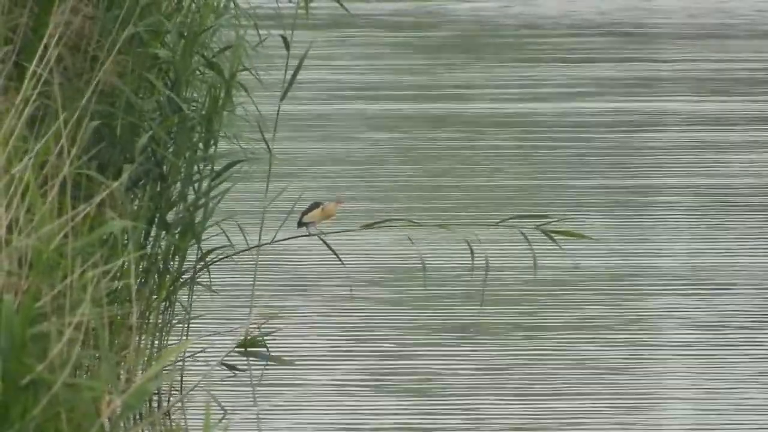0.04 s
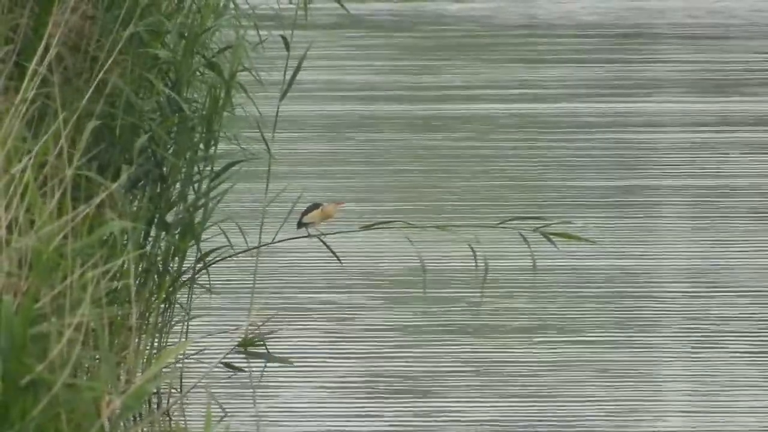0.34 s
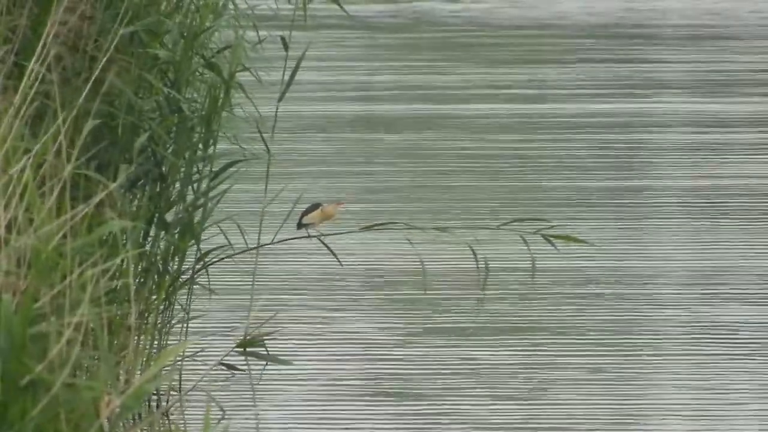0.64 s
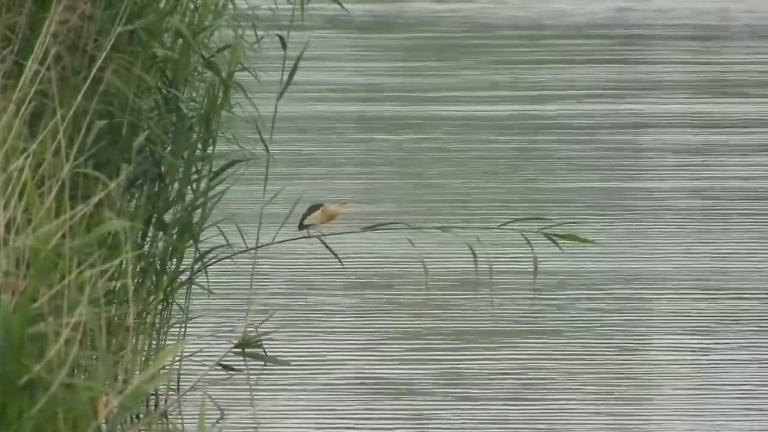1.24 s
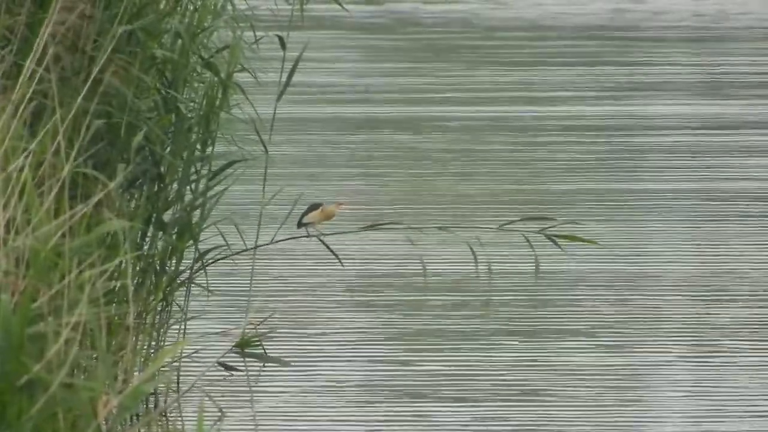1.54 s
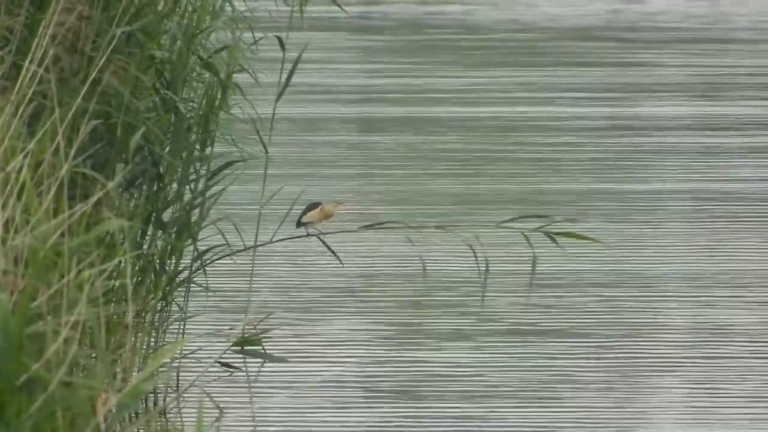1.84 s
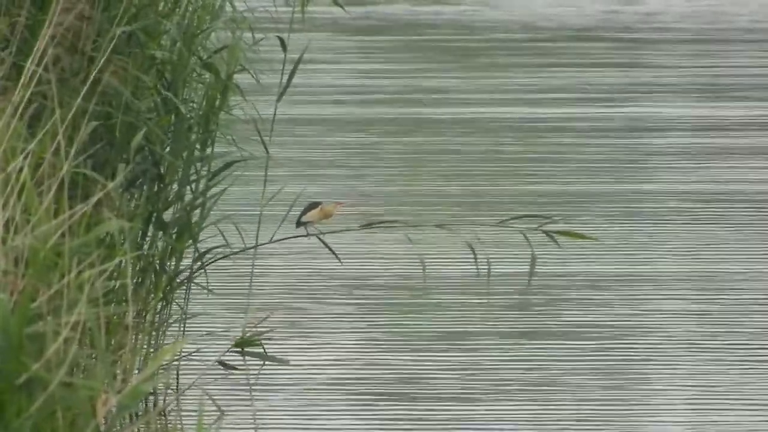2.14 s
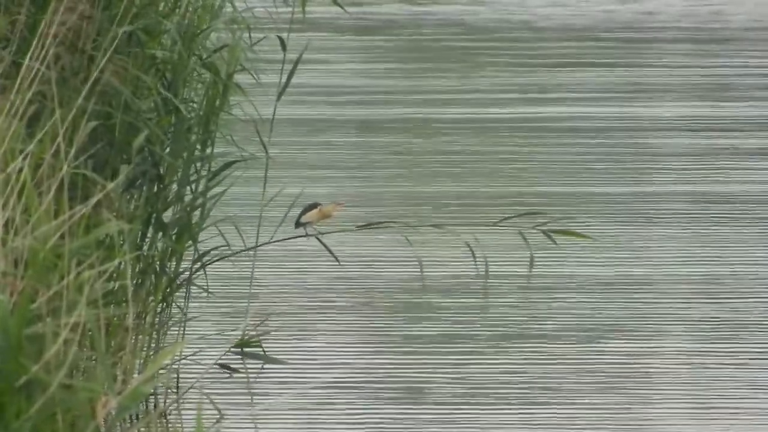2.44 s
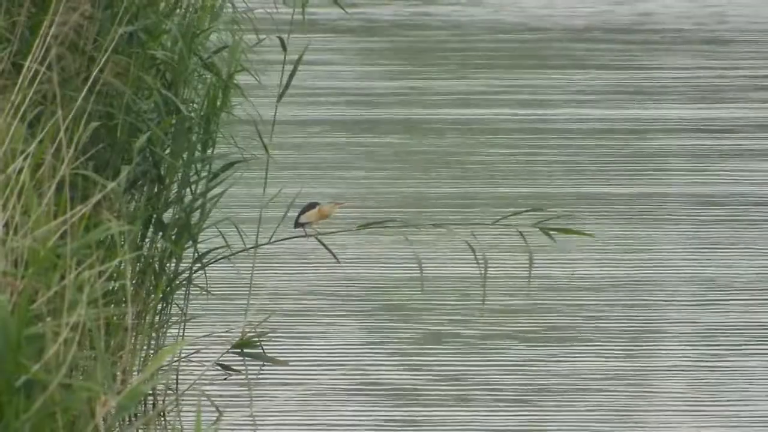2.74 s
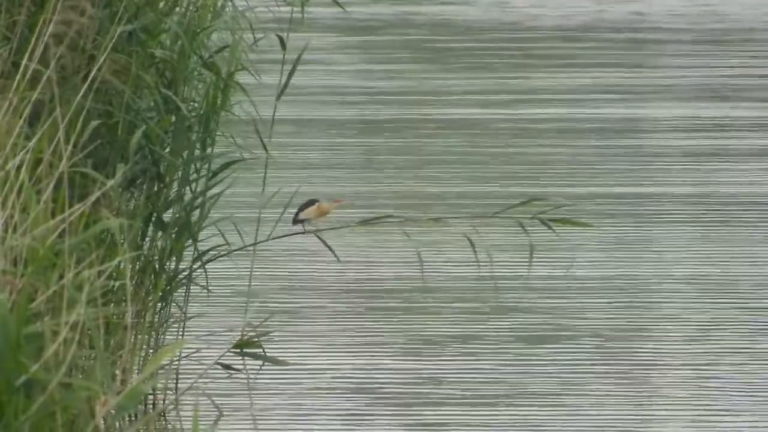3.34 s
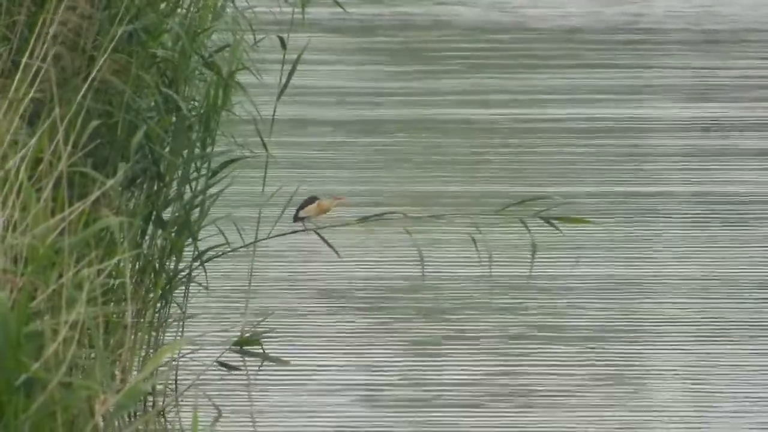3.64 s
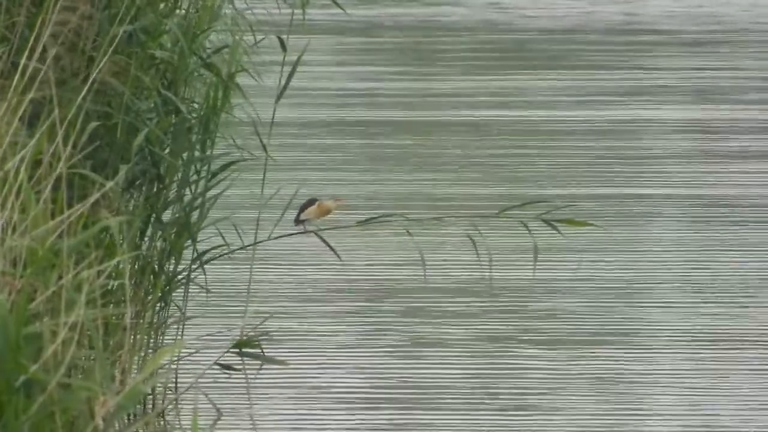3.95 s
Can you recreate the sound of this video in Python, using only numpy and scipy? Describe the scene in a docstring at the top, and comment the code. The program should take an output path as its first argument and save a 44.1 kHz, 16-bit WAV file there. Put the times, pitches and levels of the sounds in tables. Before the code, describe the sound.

Wind buffets the microphone in uneven low rumbles over faintly hissing reeds.

```python
"""Wind buffets two microphone ports at a pond's edge, each in its own rhythm: rumble in light air,
flutter in strong, puffs from eddies, one brief throb from shed vortices. Behind it: open air, hissing
reeds, two stalk ticks, far birds, faint random gliding tones, a thin whine.
Near the end a gust slaps the right port and the limiter ducks everything."""
import sys
import numpy as np
from scipy import signal
from scipy.fft import rfft, irfft
from scipy.io import wavfile
from scipy.ndimage import uniform_filter1d

SR = 44100
rng = np.random.default_rng(int(sys.argv[2]) if len(sys.argv) > 2 else 0)


def file_out(sig):
    """Save sig as 16-bit WAV at sys.argv[1]."""
    # one column per channel
    cols = np.atleast_2d(sig).T
    # limit, then scale
    lim = np.clip(cols, -1, 1)
    pcm = np.round(lim * 32767).astype(np.int16)
    wavfile.write(sys.argv[1], SR, pcm)


N = 176400
T = np.arange(N) / SR

# Ambience at the two ports: (frequency [Hz], left-right correlation [-])
PORT_CORRELATION = [(100, 0.12), (700, 0.81), (1300, 0.55), (2400, 0.16), (4400, 0.17), (6200, 0),
                    (8500, -0.4), (11000, -0.13), (15000, 0)]
# Open air and reed hiss: (frequency [Hz], relative density [dB])
AIR_SPECTRUM = [(40, 3), (200, -3.5), (400, -2), (700, -7.5), (1000, -12), (1500, -15.5), (2200, -15.5),
                (3300, -15.5), (4500, -42), (8000, -45)]
REED_SPECTRUM = [(1500, -26), (3200, -13), (3700, -2.5), (4200, 1), (4900, 0.5), (6500, -1), (8000, 1.5),
                 (9000, 1.5), (10000, -6), (11500, -11.5), (15000, -15.5)]
# Open air and reed hiss: (time [s], level [dB])
AIR_ENVELOPE = [(0, -51), (.8, -53.5), (1.35, -53), (1.72, -51.5), (1.95, -53.5), (3.2, -54.3), (4, -52)]
REED_ENVELOPE = [(0, -51), (1.2, -52.5), (2.7, -52.4), (3.45, -51), (4, -51.5)]
# Steady tones: (frequency [Hz], level [dB])
WHINE_TONES = [(7483, -77), (12947, -82)]
# Dry stalks: (time [s], level [dB], low edge [Hz], high edge [Hz])
STALK_TICKS = [(0.182, -43, 7360, 9100), (3.7343, -35, 3900, 7260)]
# Rising bird calls: (start [s], relative level [dB], rms rasp [Hz])
BIRD_CHIRPS = [(.273, -49.5, 230), (1.941, -50, 190), (3.395, -54, 750)]
# Contour of each chirp: (age [s], pitch [Hz], gain [dB])
CHIRP_CONTOUR = [(0, 4200, -12), (.006, 5400, -6), (.011, 6050, 0), (.024, 6000, -1), (.027, 6680, -1),
                 (.04, 6590, 1), (.056, 6550, -12)]
# Plain bird notes: (start [s], length [s], pitch [Hz], glide [Hz], relative level [dB])
BIRD_PEEPS = [(.395, 0.034, 5570, -330, -54), (0.812, .05, 7580, 0, -58.5), (1.16, .06, 7600, 0, -57.5),
              (1.27, 0.31, 1568, 0, -66), (1.53, 0.024, 6100, -1000, -52), (3.069, 0.029, 3990, 0, -53.5)]
# Vortex shedding, right port: (time [s], pitch [Hz], level [dB])
THROB_CONTOUR = [(3.58, 80, -30), (3.605, 85, -5), (3.622, 100, -6.5), (3.65, 70, -6), (3.675, 72, -6),
                 (3.69, 115, -7), (3.705, 120, -30)]
# Eddies: (time [s], decay [s], relative left level [dB], relative right level [dB])
EDDY_PUFFS = [(.735, 0.024, -47, -70), (1.181, 0.06, -40, -49), (1.3, .05, -41, -48),
              (1.41, 0.034, -39, -35), (1.531, 0.021, -69, -40.5), (1.824, .02, -40, -70),
              (2.05, 0.09, -37.5, -66), (2.24, .04, -38, -70), (2.36, .06, -39, -70),
              (2.737, 0.012, -27, -69), (2.923, 0.035, -35, -65), (3.009, 0.091, -38, -68),
              (3.146, 0.014, -34, -52), (3.176, 0.0076, -25, -39), (3.255, 0.018, -39, -62),
              (3.387, 0.022, -26, -50), (3.587, 0.008, -30, -42), (3.671, 0.02, -72, -38),
              (3.788, 0.019, -37, -27), (3.924, 0.017, -26.5, -47), (3.962, 0.022, -23.5, -48)]
# Eddies, light wind, strong wind: (frequency [Hz], relative density [dB])
PUFF_SPECTRUM = [(120, -27), (230, -1), (320, 4), (420, -2.5), (540, -13), (720, -26.5), (1500, -46),
                 (4000, -75)]
RUMBLE_SPECTRUM = [(20, -6.5), (43, -8.5), (65, -0.5), (95, 0), (130, -5), (190, -14), (250, -32),
                   (400, -48.5), (900, -75)]
FLUTTER_SPECTRUM = [(20, -4), (60, -10.5), (110, -2), (185, 0.5), (215, -4), (250, -20), (340, -27),
                    (430, -37), (650, -52), (1400, -77)]
# Wind pressure per port: (time [s], relative level [dB])
LEFT_PRESSURE = [(0.0, -18), (0.11, -34), (0.15, -16), (0.28, -19), (0.4, -26), (0.53, -15), (0.6, -30),
                 (0.66, -23), (0.75, -17), (0.85, -21), (1.1, -14.5), (1.22, -19), (1.42, -13.5),
                 (1.52, -27), (1.6, -33), (1.76, -35), (1.835, -14), (1.9, -38), (1.96, -15), (2.01, -11),
                 (2.08, -13), (2.12, -19.5), (2.25, -13.5), (2.35, -18), (2.44, -16), (2.6, -29),
                 (2.66, -9), (2.71, -18), (2.78, -13), (2.83, -19.5), (3.01, -9), (3.36, -19.5),
                 (3.42, -12), (3.46, -25), (3.51, -17), (3.59, -20), (3.62, -30), (3.74, -35), (3.8, -11),
                 (3.88, -19), (3.99, -7)]
RIGHT_PRESSURE = [(0, -18), (.05, -17), (.1, -37), (.23, -21), (.36, -22), (.39, -14.5), (.46, -33),
                  (.93, -31), (1.04, -17), (1.13, -19), (1.34, -15.5), (1.4, -18), (1.55, -14.5),
                  (1.62, -27), (1.7, -33), (2.02, -31.5), (2.09, -25), (2.2, -31), (2.47, -32), (2.55, -21),
                  (2.69, -27), (2.72, -19), (2.82, -21), (3.06, -25), (3.18, -14), (3.28, -30),
                  (3.42, -14.5), (3.5, -22.5), (3.6, -15), (3.72, -17), (3.78, -13), (3.82, -6),
                  (3.99, -17)]

BIN_HZ = np.fft.rfftfreq(N, 1 / SR)
RIGHT_ONLY, OPPOSED = np.array([[0], [1]]), np.array([[1], [-1]])


def from_db(db):
    """Decibels to gain."""
    return 10 ** (np.asarray(db) / 20)


def unit_rms(x):
    """Scale to rms 1."""
    return x / np.sqrt(np.mean(x ** 2) + 1e-20)


def over_time(rows):
    """Table interpolated at every sample."""
    return np.interp(T, *np.transpose(rows))


def over_hz(rows):
    """Table interpolated at every FFT bin, log axis."""
    hz, value = np.transpose(rows)
    return np.interp(np.log(BIN_HZ + 1e-3), np.log(hz), value)


def sine(hz, phase_rad=0):
    """Sine following a pitch curve."""
    return np.sin(2 * np.pi * np.cumsum(hz) / SR + phase_rad)


def bell(centre_s, width_s, time_s=T):
    """Gaussian pulse, peak 1."""
    return np.exp(-.5 * ((time_s - centre_s) / width_s) ** 2)


def drift(rate_hz):
    """Low-passed random wander, rms 1."""
    return unit_rms(irfft(rfft(rng.standard_normal(N)) / (1 + (BIN_HZ / rate_hz) ** 2), N))


def diffuse_noise(spectrum):
    """Noise reaching both ports from all around, rms 1."""
    mid, side = rfft(rng.standard_normal((2, N))) * from_db(over_hz(spectrum))
    correlation = over_hz(PORT_CORRELATION)
    return unit_rms(irfft(np.sqrt(1 + correlation) * mid + np.sqrt(1 - correlation) * side * OPPOSED, N))


def turbulence(spectrum, window_s=.047):
    """Coloured noise, rms 1, slow swings evened out so the gusts set the level."""
    noise = unit_rms(irfft(rfft(rng.standard_normal(N)) * from_db(over_hz(spectrum)), N))
    size = int(window_s * SR)
    power = uniform_filter1d(uniform_filter1d(noise ** 2, size), size)
    return unit_rms(noise / np.sqrt(power + 1e-9))


def whine():
    """Thin, steady high tones."""
    return sum(from_db(db) * np.sin(2 * np.pi * hz * T) for hz, db in WHINE_TONES)


def open_air():
    """Soft, dark wash from all around."""
    return from_db(over_time(AIR_ENVELOPE)) * diffuse_noise(AIR_SPECTRUM)


def blips(per_s=115, low_hz=580, high_hz=3438, tilt_db_per_octave=-2.8, glide_octaves_per_s=1.5):
    """Faint, short, random gliding tones that swell with the air noise."""
    size = SR // 5
    out = np.zeros((2, N + size))
    local_s = T[:size] - T[size // 2]
    for when, height, length, strength, side, glide, path in rng.random((int(per_s * N / SR), 7)):
        octaves = height * np.log2(high_hz / low_hz)
        hz = low_hz * 2 ** (octaves + glide_octaves_per_s * (2 * glide - 1) * local_s)
        db = -58.5 + tilt_db_per_octave * octaves + 2 * (2 * strength - 1)
        pan_db = 6 * (side - .5) * OPPOSED
        envelope = from_db(db + pan_db) * bell(0, .0125 * (.5 + length), local_s)
        start = int(when * N)
        out[:, start:start + size] += envelope * sine(hz, phase_rad=(2 * path - 1) * OPPOSED)
    air_db = over_time(AIR_ENVELOPE)
    return from_db(air_db - air_db.mean()) * out[:, size // 2:size // 2 + N]


def reeds(flicker_db=1):
    """Countless leaves brush together in a flickering hiss."""
    db = over_time(REED_ENVELOPE) + flicker_db * drift(rate_hz=10)
    return from_db(db) * diffuse_noise(REED_SPECTRUM)


def stalk_ticks():
    """Dry stalks tick: tiny bursts of band noise."""
    out = np.zeros((2, N))
    for time_s, db, low_hz, high_hz in STALK_TICKS:
        band = signal.butter(3, [low_hz, high_hz], "band", fs=SR, output="sos")
        noise = unit_rms(signal.sosfilt(band, rng.standard_normal((2, N))))
        out += from_db(db) * bell(time_s, width_s=.0013) * noise
    return out


def birds(gain_db=-3, echo_db=5, t60_s=.35):
    """Far chirps and peeps, smeared by scattering in the reed bed."""
    song = np.zeros(N)
    age_s, contour_hz, contour_db = np.transpose(CHIRP_CONTOUR)
    for start_s, db, rasp_hz in BIRD_CHIRPS:
        gate = (T > start_s) * (T < start_s + age_s[-1])
        envelope = gate * from_db(db + np.interp(T - start_s, age_s, contour_db))
        hz = np.interp(T - start_s, age_s, contour_hz) + rasp_hz * drift(rate_hz=530)
        song += envelope * sine(hz)
    for start_s, length_s, hz, glide_hz, db in BIRD_PEEPS:
        progress = np.clip((T - start_s) / length_s, 0, 1)
        song += from_db(db) * np.sin(np.pi * progress) * sine(hz + glide_hz * progress)
    tail = rng.standard_normal((2, SR // 2)) * from_db(-60 * T[:SR // 2] / t60_s)
    tail /= np.sqrt(np.sum(tail ** 2) / 2)
    echo = signal.fftconvolve(song[None], tail, axes=1)[:, :N]
    return from_db(gain_db) * (song + from_db(echo_db) * echo)


def vortex_throb():
    """Vortices shed evenly at the right port: a low tone whose pitch follows the air speed."""
    time_s, hz, db = np.transpose(THROB_CONTOUR)
    envelope = from_db(np.interp(T, time_s, db)) * (T > time_s[0]) * (T < time_s[-1])
    tone = sine(np.interp(T, time_s, hz), phase_rad=2 * np.pi * rng.random())
    return uniform_filter1d(envelope, size=300) * tone * RIGHT_ONLY


def eddies(puff_gain_db=5, attack_s=.003, front_gain_db=1, front_width_s=.00045):
    """Eddies hit the ports: a steep pressure front, then a decaying puff."""
    envelope, fronts = np.zeros((2, N)), np.zeros((2, N))
    for time_s, decay_s, left_db, right_db in EDDY_PUFFS:
        age_s = T - time_s
        port_gain = from_db([[left_db], [right_db]])
        rise = np.clip(age_s / attack_s + 1, 0, 1)
        envelope += port_gain * rise * np.exp(-np.clip(age_s / decay_s, 0, 40))
        fronts += port_gain * age_s / front_width_s * bell(time_s, front_width_s)
    puffs = envelope * np.array([turbulence(PUFF_SPECTRUM), turbulence(PUFF_SPECTRUM)])
    return from_db(puff_gain_db) * puffs + from_db(front_gain_db) * fronts


def gust_slap(time_s=3.8184, width_s=.00125, crack_s=3.8172):
    """A gust slaps the right port: deep suction inside a broader push, with a sharp crack."""
    pressure = bell(time_s, 3 * width_s) / 3 - bell(time_s, width_s)
    crack = bell(crack_s, width_s=.0004) * rng.standard_normal(N)
    return (from_db(15.5) * pressure + from_db(-30) * crack) * RIGHT_ONLY


def buffeting(pressure, crossover_db, transition_db=4, surge_cap=1.2):
    """Wind on one port: lumpy rumble gives way to flutter as pressure rises."""
    db = over_time(pressure)
    flutter_share = 1 / (1 + np.exp((crossover_db - db) / transition_db))
    # Flow can drop far; surges level off.
    lumps = -np.logaddexp(-2 * drift(rate_hz=27), -2 * surge_cap) / 2
    rumble = unit_rms(turbulence(RUMBLE_SPECTRUM) * from_db(2 * lumps))
    flutter = unit_rms(turbulence(FLUTTER_SPECTRUM) * from_db(4 * lumps))
    return from_db(db) * (np.sqrt(1 - flutter_share) * rumble + np.sqrt(flutter_share) * flutter)


def scene():
    """Wind on the ports over the quiet pond."""
    wind = np.array([from_db(1.3) * buffeting(LEFT_PRESSURE, crossover_db=-16),
                     from_db(-.2) * buffeting(RIGHT_PRESSURE, crossover_db=-8)])
    pond = open_air() + reeds() + stalk_ticks() + birds() + blips()
    pond *= from_db([[-.43], [.43]])
    return whine() + pond + wind + eddies() + gust_slap() + vortex_throb()


def record(dry, low_cut_hz=42, attack_s=.0002, release_db_per_s=8, fade_s=.008, high_cut_hz=15050):
    """Low cut, stereo-linked limiter at full scale, end fades, high cut."""
    fed = signal.sosfilt(signal.butter(3, low_cut_hz, "high", fs=SR, output="sos"), dry)
    over_db = np.maximum(20 * np.log10(np.abs(fed).max(axis=0) + 1e-9), 0)
    held_db = np.maximum.accumulate(over_db + release_db_per_s * T) - release_db_per_s * T
    pole = np.exp(-1 / (attack_s * SR))
    reduction_db = signal.lfilter([1 - pole], [1, -pole], held_db)
    limited = np.clip(fed * from_db(-reduction_db), -1, 1)
    edge_s = np.minimum(T, T[::-1])
    fade = np.sin(np.pi / 2 * np.minimum(edge_s / fade_s, 1)) ** 2
    high_cut = signal.ellip(12, .1, 90, high_cut_hz, fs=SR, output="sos")
    return signal.sosfilt(high_cut, fade * limited)


dry = scene()
out = record(dry)
file_out(out)
```